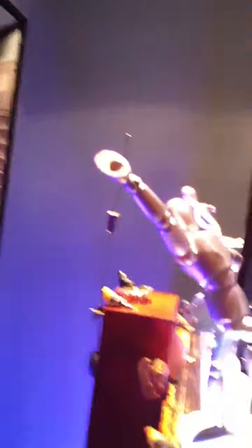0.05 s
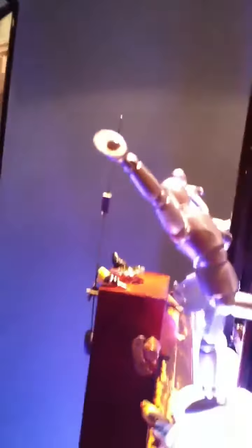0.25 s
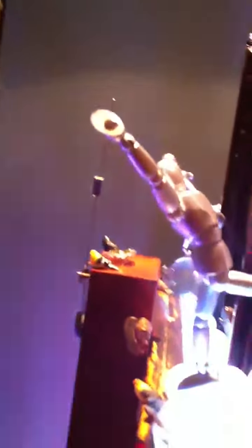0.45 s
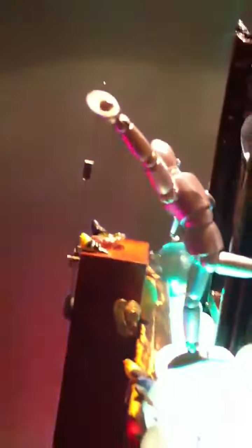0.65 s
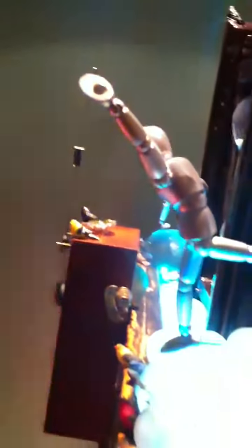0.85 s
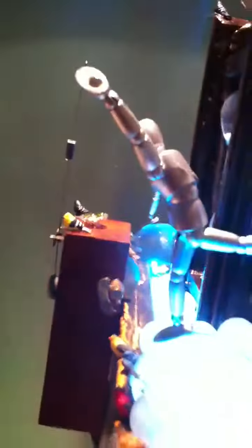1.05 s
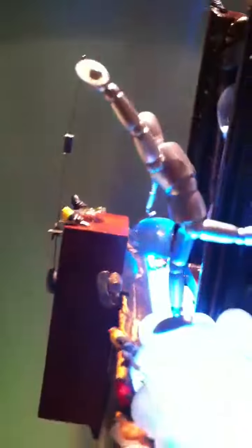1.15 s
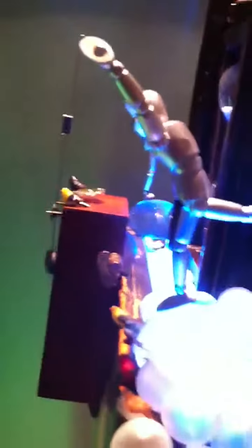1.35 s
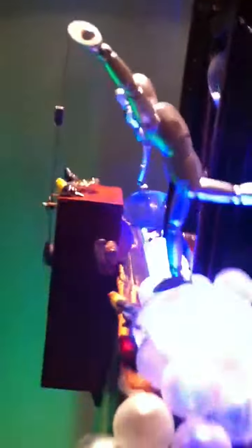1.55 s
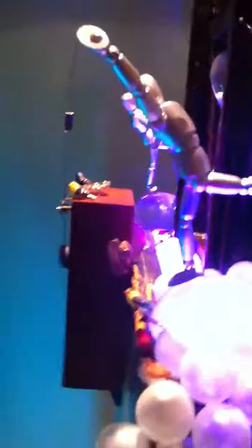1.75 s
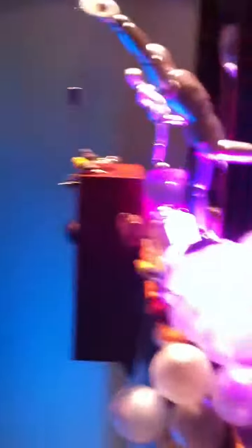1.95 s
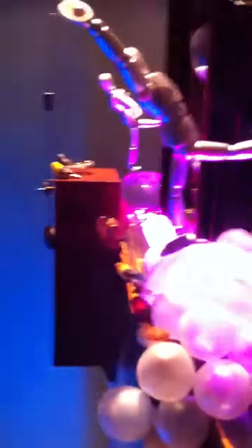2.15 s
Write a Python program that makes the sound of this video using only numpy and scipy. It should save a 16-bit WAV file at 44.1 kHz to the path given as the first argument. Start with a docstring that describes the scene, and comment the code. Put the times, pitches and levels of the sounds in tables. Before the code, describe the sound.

A hand shifts its grip right on the microphone, making a sharp clack, then irregular clicks, a softer knock and a closing rub of skin. Behind it are quiet indoor ventilation hum and a thin motor whine that swells and fades.

```python
"""In a quiet gallery ventilation hums and a small motor whines, swelling and fading throughout.
A hand shifts its grip on a phone: a few finger ticks, then a hard clack on the case at a quarter second.
The grip creaks at 0.7 s and slips in small clicks; a lighter knock follows near 1.7 s.
Dull finger bumps crowd in, and skin drags over the case in a last sliding rustle."""
import sys
import numpy as np
from scipy import signal
from scipy.fft import rfft, irfft
from scipy.io import wavfile

SR = 44100
rng = np.random.default_rng(int(sys.argv[2]) if len(sys.argv) > 2 else 0)


def log_audio(samples):
    """Write samples as a 16-bit WAV file to the path given in sys.argv[1]."""
    # one column per channel
    frames = np.atleast_2d(samples).T
    # limit to full scale, then quantise
    limited = np.clip(frames, -1, 1)
    pcm = np.round(limited * 32767).astype(np.int16)
    wavfile.write(sys.argv[1], SR, pcm)


N = 97020
T = np.arange(N) / SR


def undb(db):
    """Decibels to gain."""
    return 10 ** (np.asarray(db) / 20)


def fader(table, column):
    """Gain over time from a column of levels in dB; the first column is the time."""
    rows = np.array(table)
    return undb(np.interp(T, rows[:, 0], rows[:, column]))


def noise(spectrum):
    """Noise of unit RMS, coloured by points of frequency and relative level."""
    hz, db = np.array(spectrum).T
    bins_hz = np.maximum(np.arange(N // 2 + 1) * SR / N, 1)
    colour = undb(np.interp(np.log(bins_hz), np.log(hz), db))
    x = irfft(rfft(rng.standard_normal(N)) * colour, N)
    return x / x.std()


def drift(rate_hz):
    """Smooth random movement with unit spread."""
    bins_hz = np.arange(N // 2 + 1) * SR / N
    x = irfft(rfft(rng.standard_normal(N)) * np.exp(-(bins_hz / rate_hz) ** 2), N)
    return x / x.std()


def pole(x, hz, kind="low"):
    """Gentle one-pole filter."""
    return signal.lfilter(*signal.butter(1, min(hz, SR / 2 - 1000), kind, fs=SR), x)


def resonate(x, hz, damping, kind):
    """Two-pole resonance: low, band or high output."""
    w = 2 * np.tan(np.pi * hz / SR)
    numerator = {"low": [w * w], "band": [damping * w, 0], "high": [1, 0, 0]}[kind]
    return signal.lfilter(*signal.bilinear(numerator, [1, damping * w, w * w]), x)


def peak(x):
    """Scale to a peak of one."""
    return x / np.abs(x).max()


def push():
    """One instant push, with room after it for a ring to die away."""
    return signal.unit_impulse(4096)


def mic_bass_cut(x):
    """The microphone's bass cut turns a push into a short low swing."""
    return pole(resonate(x, hz=172, damping=.5, kind="high"), 60, "high")


def add(out, start_s, x):
    """Mix a sound in at its time."""
    i = int(start_s * SR)
    out[i:i + len(x)] += x[:max(N - i, 0)]


def ventilation():
    """Wavering low tones in a bed of dull air noise."""
    # hum tones: pitch_hz, level_db, waver_hz
    tones = [(119.5, -60.5, 5), (188.6, -58.5, 12), (262.6, -62.5, 7.2), (309, -70.5, 8.7),
             (359, -68, 12.4), (601, -70.5, 18)]
    # colour of the air: frequency_hz, relative_db
    air_colour = [(20, -32), (50, -21), (85, -14), (120, 0.5), (190, 0.5), (330, -3), (450, -10.5),
                  (700, -12.5), (1300, -15), (1900, -27.5), (3500, -35.5), (8000, -35), (15500, -33)]
    hum = np.zeros(N)
    for pitch_hz, level_db, waver_hz in tones:
        tone = np.sqrt(2) * np.sin(2 * np.pi * pitch_hz * T + .96 * drift(waver_hz))
        hum += undb(level_db) * tone * (1 + .3 * drift(waver_hz))
    return hum + undb(-56.5) * noise(air_colour)


def motor():
    """A small motor: a thin, fluttering whine over a soft whirr, both swelling and fading."""
    # swells of the motor: time_s, whine_db, whirr_db
    swells = [(0, -62.5, -65.5), (.16, -61, -65), (.23, -59, -57.5), (.29, -54, -54.5), (.45, -54, -55.5),
              (.68, -58, -58), (.82, -62, -64), (.93, -62, -71), (1.06, -62.5, -62.5), (1.17, -58, -56.5),
              (1.25, -54.5, -55.5), (1.34, -65, -60), (1.48, -66.5, -69), (1.62, -65.5, -75),
              (1.88, -66, -66), (1.97, -56.5, -53.5), (2.2, -53, -53.5)]
    # colour of the whirr: frequency_hz, relative_db
    whirr_colour = [(100, -32), (300, 4), (600, -1), (1000, -4.5), (1400, 1), (1900, -7.5), (3000, -14),
                    (5000, -21), (9000, -30.5), (15500, -57)]
    pitch_hz = 1516 * (1 + .00063 * drift(10.5))
    phase = 2 * np.pi * np.cumsum(pitch_hz) / SR
    whine = np.sqrt(2) * np.sin(phase) * undb(.38 * drift(25))
    return fader(swells, 1) * whine + fader(swells, 2) * noise(whirr_colour)


def grip():
    """Fingers stick and slip in sharp little clicks and land in soft bumps."""
    # stick-slip clicks: start_s, peak_db, brightness_hz
    clicks = [(.1962, -47, 700), (.2017, -39, 1200), (.2148, -47, 3000), (0.2187, -39, 2000),
              (.2712, -33.5, 500), (0.3727, -33, 5000), (0.7216, -33.5, 1100), (0.7234, -27.5, 690),
              (0.73, -40, 500), (0.7318, -32.5, 800), (0.7387, -35, 600), (.7447, -38, 900),
              (0.7558, -39.5, 600), (0.767, -46, 900), (0.7712, -43, 800), (.7730, -36, 700),
              (1.119, -28.5, 706), (1.2974, -40, 1500), (1.7162, -46, 900), (1.7265, -27, 596),
              (1.7290, -43, 700), (1.7696, -45, 3000), (1.8199, -28.5, 900), (2.1770, -34, 3000),
              (2.1864, -33, 6000), (2.1962, -32, 7050)]
    # finger bumps: start_s, peak_db, pitch_hz
    bumps = [(0.1964, -33.5, 260), (.2020, -31, 262), (0.207, -33.5, 240), (0.2153, -33.5, 200),
             (0.2197, -41, 200), (0.7376, -40, 307), (0.771, -39.5, 218), (1.1224, -36, 304),
             (1.3018, -37, 230), (1.377, -47, 158), (1.7520, -38.5, 260), (1.8037, -28, 450),
             (1.8061, -28, 345), (1.8115, -26.5, 233), (1.8177, -36.5, 204), (1.8873, -28, 240),
             (1.9036, -36, 327), (1.9129, -38, 250), (1.9188, -38, 240), (1.9316, -34.5, 407),
             (1.9356, -22.5, 270), (1.9402, -28, 500), (1.9430, -27, 600), (1.9494, -27.5, 500),
             (1.956, -45, 350)]
    out = np.zeros(N)
    for start_s, peak_db, brightness_hz in clicks:
        click = pole(pole(push(), brightness_hz), 3100)
        add(out, start_s, undb(peak_db) * peak(mic_bass_cut(click)))
    for start_s, peak_db, pitch_hz in bumps:
        bump = resonate(push(), pitch_hz, damping=1, kind="low")
        add(out, start_s, undb(peak_db) * peak(mic_bass_cut(bump)))
    return out


def snap(brightness_hz):
    """The crisp instant of contact."""
    contact = resonate(push(), brightness_hz, damping=1.27, kind="low")
    return -peak(pole(contact, 1300, "high"))


def knocks():
    """Each knock is a low thud, a very short ring of the case and a sharp snap."""
    # hard knocks on the case: start_s, thud_db, ring_db, ring_hz, snap_db, snap_hz
    hits = [(.23542, -14.5, -18.5, 1040, -48, 2800), (.24420, -27.5, -30, 1020, -25, 820),
            (.24788, -6.3, -8, 1580, -21, 2700), (.25044, -18.8, -35, 550, -15, 1640),
            (1.66384, -25.5, -17.4, 1040, -22.5, 1450)]
    out = np.zeros(N)
    body = resonate(push(), hz=286, damping=1.18, kind="low")
    thud = peak(mic_bass_cut(pole(body, 3800)))
    for start_s, thud_db, ring_db, ring_hz, snap_db, snap_hz in hits:
        ring = resonate(push(), ring_hz, damping=.9, kind="band")
        ring = peak(resonate(ring, ring_hz, damping=.9, kind="low"))
        add(out, start_s, undb(thud_db) * thud - undb(ring_db) * ring + undb(snap_db) * snap(snap_hz))
    add(out, .24871, undb(-5.6) * snap(1750))  # the case chatters once after the hardest knock
    return out


def crack(start_s=.248, decay_s=.0012):
    """A millisecond of bright grit as the hardest knock lands."""
    age_s = np.maximum(T - start_s, 0)
    envelope = (T > start_s) * np.exp(-age_s / decay_s)
    grit = pole(rng.standard_normal(N), 5000, "high")
    return undb(-34) * envelope * grit


def creak(start_s=.717, fade_s=.048):
    """The grip drags between its slips: a rough scrape with a fast attack that soon dies away."""
    age = (T - start_s) / fade_s
    envelope = np.clip(age / .1, 0, 1) * np.exp(-2 * age ** 2)
    grains = rng.standard_normal(N) * undb(4 * drift(700))
    dulled = pole(pole(grains, 700), 3000)
    scrape = resonate(dulled, hz=380, damping=.7, kind="high")
    return undb(-50) * envelope * scrape / scrape.std()


def slide(grain_db=1, grain_hz=900):
    """Skin drags over the case: a grainy low rub and a fine hiss."""
    # stroke of the hand: time_s, rub_db, hiss_db
    stroke = [(0, -97, -74), (1.68, -78, -71), (1.73, -49.5, -70.5), (1.82, -47.5, -63), (1.85, -53, -70),
              (1.89, -43, -60), (1.92, -43, -67), (1.945, -34, -58.5), (1.97, -49, -52.5),
              (2.01, -62, -58.5), (2.08, -57, -59), (2.15, -62, -58.5), (2.2, -90, -55)]
    # colour of the rub: frequency_hz, relative_db
    rub_colour = [(50, -19), (150, 1.5), (350, -4), (700, -9.5), (1400, -18.5), (3000, -27.5), (15000, -62)]
    # colour of the hiss: frequency_hz, relative_db
    hiss_colour = [(200, -38), (1000, -12), (2200, 1), (4000, -3.5), (8000, -8.5), (11000, -14.5),
                   (15500, -16)]
    grain = undb(grain_db * drift(grain_hz))
    grain /= np.sqrt(np.mean(grain ** 2))
    return grain * (fader(stroke, 1) * noise(rub_colour) + fader(stroke, 2) * noise(hiss_colour))


def scene():
    """A mono bed of ventilation and motor, with the handling noise on top."""
    return (ventilation() + motor() + grip() + knocks() + crack() + creak() + slide())[None]


def record(dry):
    """The phone cuts the top steeply above 15.8 kHz."""
    return signal.sosfilt(signal.ellip(10, .1, 70, 15800, fs=SR, output="sos"), dry)


dry = scene()
out = record(dry)
log_audio(out)
```